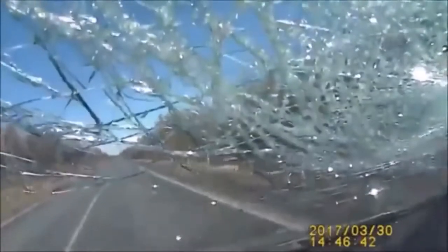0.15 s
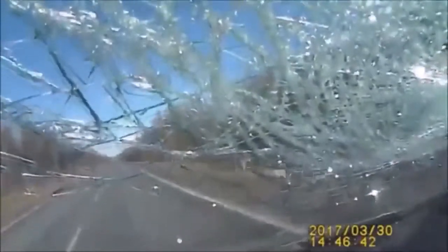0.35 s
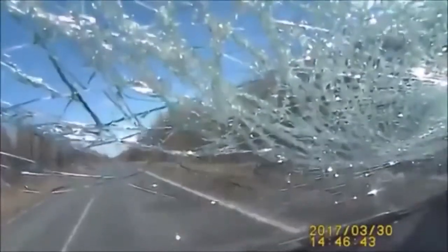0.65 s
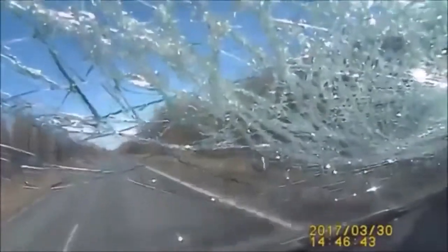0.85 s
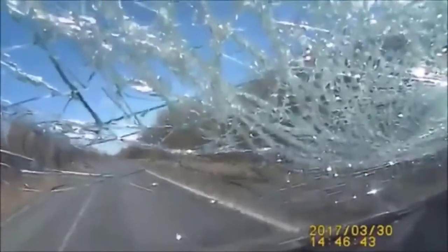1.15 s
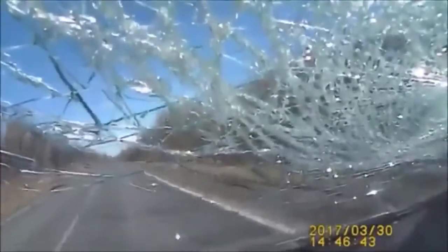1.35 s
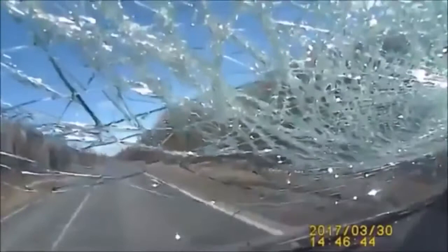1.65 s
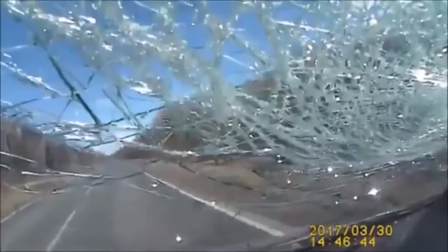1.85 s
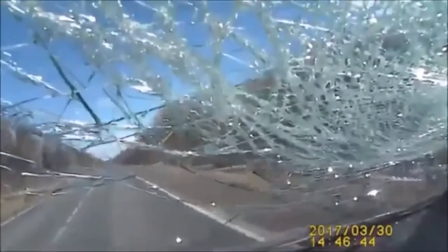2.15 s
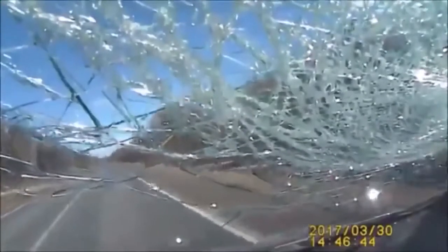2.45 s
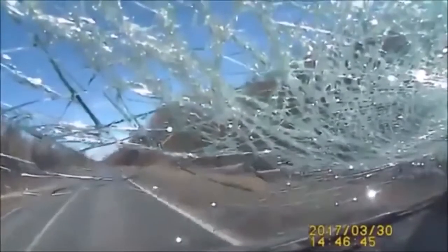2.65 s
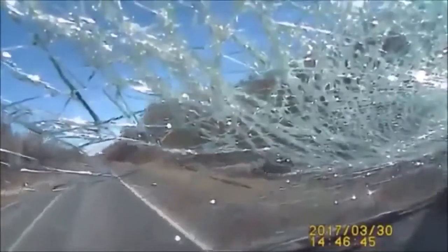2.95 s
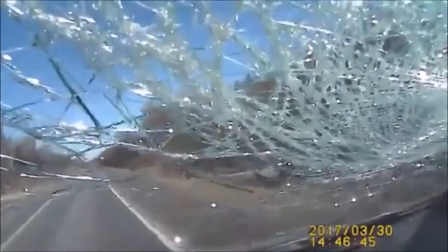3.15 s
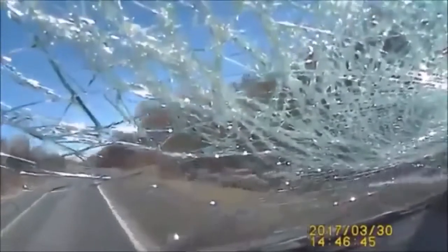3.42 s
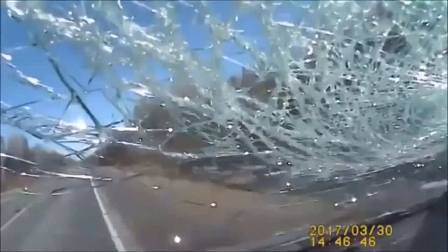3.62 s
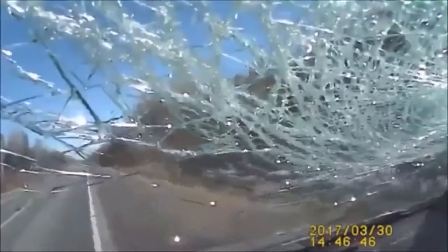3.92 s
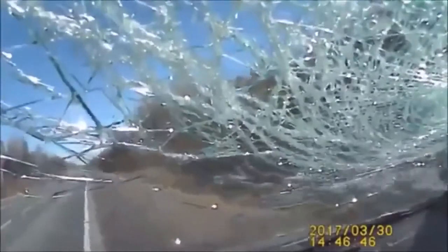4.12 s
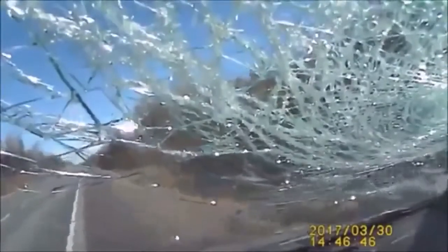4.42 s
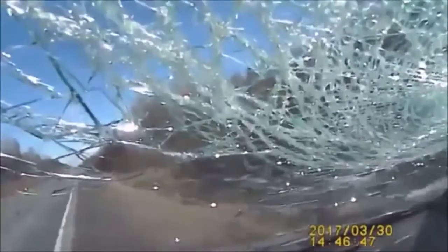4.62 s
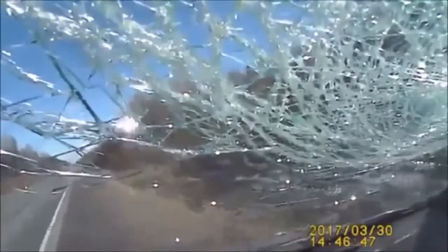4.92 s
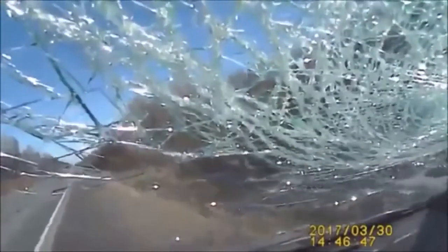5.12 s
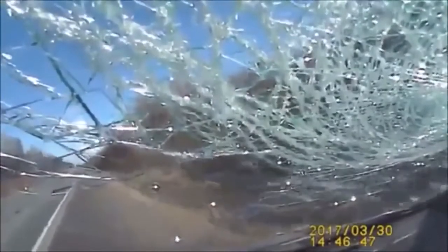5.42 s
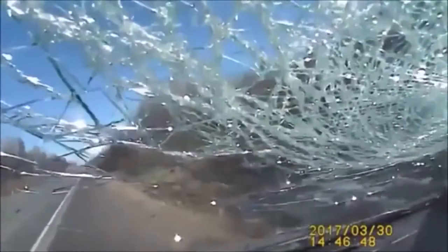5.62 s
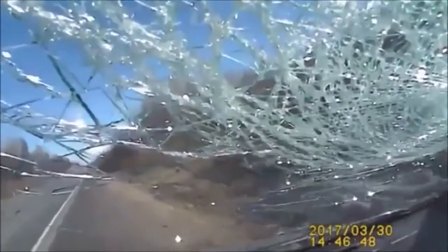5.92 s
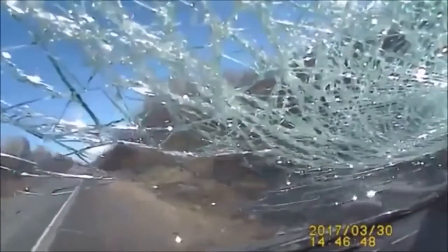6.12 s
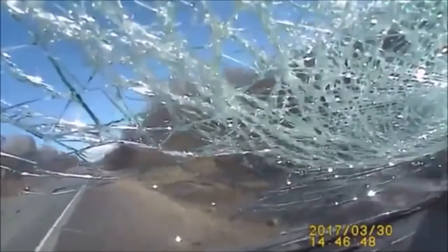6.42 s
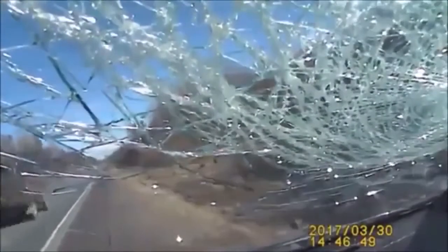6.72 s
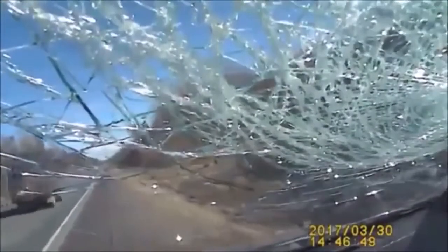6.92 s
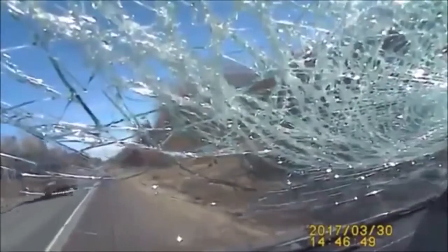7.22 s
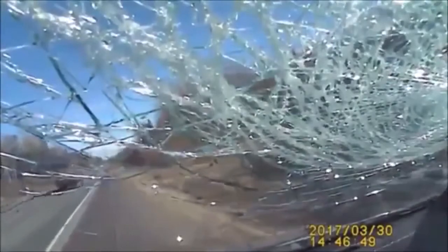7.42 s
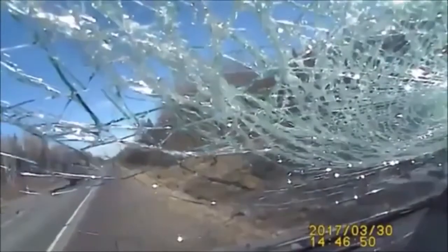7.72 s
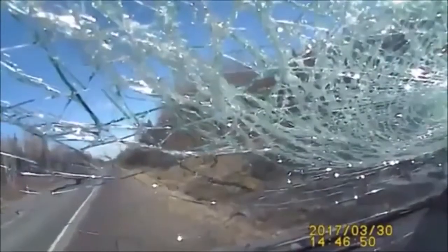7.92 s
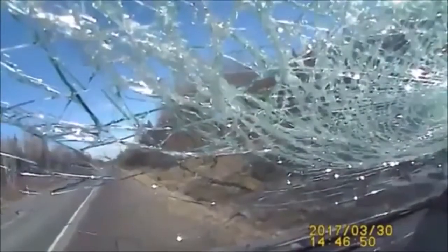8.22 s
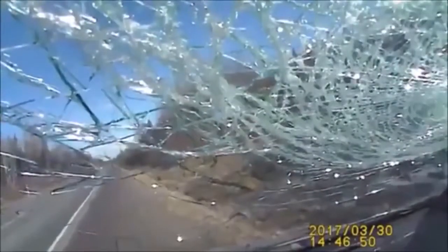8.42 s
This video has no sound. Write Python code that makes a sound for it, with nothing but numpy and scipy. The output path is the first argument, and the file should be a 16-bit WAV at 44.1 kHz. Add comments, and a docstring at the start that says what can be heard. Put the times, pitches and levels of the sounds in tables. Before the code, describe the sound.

Inside a moving car, loud tyre roar, body rumble and wind through a cracked windshield fade as it slows. Midway, something crashes twice against the broken pane and tumbles with thumps and crunching glass. Loose glass ticks, then oncoming traffic swells past, dropping in pitch, while a few splinters snap. A small dashboard microphone adds constant hiss and a buzzing whine, and distorts on the hardest blows.

```python
"""Inside a car that slows down and drifts to the roadside behind a shattered windshield.
Tyre roar and wind in the cracks start loud, with a brief tick and a short gust-like surge, then die away.
Near 3.5 s something crashes twice against the broken pane and tumbles, and loose glass ticks as it settles.
From about 6 s oncoming traffic swells and passes, dropping in pitch, while a few more splinters snap.
All along, a small dashboard camera adds its own hiss and pulsing whine; the hardest blows overload it."""
import sys
import numpy as np
from scipy import signal
from scipy.fft import rfft, irfft, next_fast_len
from scipy.io import wavfile

SR = 44100
rng = np.random.default_rng(int(sys.argv[2]) if len(sys.argv) > 2 else 0)


def persist_wave(psi):
    """Save psi, clipped to +-1, as 16-bit WAV."""
    counts = np.round(np.clip(psi, -1, 1) * 32767).astype(np.int16)
    wavfile.write(sys.argv[1], SR, np.atleast_2d(counts).T)


N = 377496
TIME = np.arange(N) / SR
AGE = TIME[:SR // 2]   # seconds since a hit

# Tone colours of the noises, each listed as (pitch [Hz], relative level [dB])
HISS_COLOUR = [(60, -2), (1000, -3.5), (2500, -4), (4000, -1.5), (6000, 1), (7300, 8.5), (8000, -37)]   # the camera's electronics
RUMBLE_COLOUR = [(40, -22), (80, -8), (115, -3.5), (200, -4), (330, 2.5), (480, -2.5), (700, -8.5),
                 (1500, -38)]   # the shaking car body
BOOM_COLOUR = [(15, -15), (30, -7.5), (55, 2), (90, -1), (130, -13), (300, -49)]   # the suspension
SWAY_COLOUR = [(3, -5.5), (8, -10.5), (18, -12), (28, -8), (45, -27), (120, -62), (400, -79)]   # air swaying in the cabin
ROAR_COLOUR = [(300, -37), (480, -6.5), (630, -3.5), (760, -0.5), (960, -6), (1150, -2.5), (1350, -9.5),
               (1600, -20.5), (2600, -29)]   # tyres on the road
TREAD_COLOUR = [(450, -35), (650, -13.5), (810, -6), (900, -3.5), (990, -7), (1200, -12), (1500, -28),
                (2500, -44)]   # the hum of the tyre tread
WIND_COLOUR = [(900, -21), (1400, -0.5), (1900, -0.5), (2500, 5), (2900, -0.5), (3300, -9), (4500, -9),
               (7000, -22.5)]   # wind in the cracks
# The camera's electrical whine, an even ladder of tones: (rung [number], level [dB], flip time [s])
WHINE_TONES = [(0, -50.5, 0.00067), (1, -48, .001), (2, -42.5, 0.0025), (3, -39, .001), (4, -31.5, 0.00055),
               (5, -19.5, 0.00034)]
# Pitches that the closed cabin boosts: (pitch [Hz], width [Hz], boost [dB])
CABIN_BOOSTS = [(122, 19, 4), (184, 58, 4), (342, 120, 1.5), (582, 43, 2.5), (648, 17, 7), (727, 22, 3),
                (940, 25, 4.5), (1054, 8.7, 7)]
# The car's speed, told by how loud its body rumbles: (time [s], level [dB])
SPEED_AS_RUMBLE = [(0, -23.5), (1.25, -24.5), (1.85, -26.5), (2.3, -29), (3.25, -31), (4.3, -38.5),
                   (4.6, -41), (5.25, -40.5), (5.55, -45), (6.2, -42), (8.5, -43.3)]
# Bumps in the road that rock the car: (time [s], boom level [dB])
ROAD_BUMPS = [(.02, -41), (1.3, -45), (3.15, -37.5), (3.6, -30.5), (4.17, -34.5), (5.2, -43), (6.4, -46),
              (7.5, -41)]
# Swells of tyre noise from oncoming traffic: (time [s], level [dB], half width [s])
TRAFFIC_SWELLS = [(6.07, -28, 0.3), (6.78, -25.5, 0.22), (7.22, -29, 0.27), (7.9, -29, 0.25),
                  (8.4, -30, .25)]
# Pitches at which grinding glass edges ring: (pitch [Hz], width [Hz], relative level [dB])
GLASS_RINGS = [(1980, 230, -4.5), (2380, 260, 1.5), (2830, 260, 0), (3570, 630, -7), (4440, 840, -8),
               (5120, 970, -12.5), (6630, 410, -12)]
# Pitches at which the panel (pane and dashboard) rings: (pitch [Hz], width [Hz], relative level [dB])
PANEL_RINGS = [(171, 136, -9), (302, 53, -3.5), (439, 114, -2.5), (624, 102, -3), (770, 53, 2),
               (1022, 104, -2.5), (1245, 130, -6.5), (1660, 240, -11.5)]
# Splinters snapping off along the cracks: (time [s], snap level [dB], clink pitch [Hz], clink level [dB])
SPLINTERS = [(1.102, -23, 3900, -18), (3.013, -21, 550, -12), (4.122, -32, 2800, -24),
             (4.347, -33, 3070, -22), (6.285, -23, 2410, -33), (7.282, -12, 1110, -7.5),
             (7.492, -19, 2700, -30)]
# Low thumps during the crash and tumble: (time [s], level [dB], pitch [Hz], fade time [s])
LOW_THUMPS = [(3.618, -9, 60, .14), (3.697, 5.5, 119, 0.04), (3.834, -26, 134, 0.17),
              (4.174, -23, 187, .18), (4.245, -15.5, 256, .11)]
# A brief tick and a short gust-like surge in the road noise, then (from 3.4 s) the blows on the pane:
# (time [s], panel level [dB], glass level [dB], base rise time [s], base fade time [s],
# ring pitch [Hz], ring level [dB])
SUDDEN_SOUNDS = [(0.13, -17, -28, .001, 0.07, 770, -25), (.652, -13.5, -31, 0.0064, 0.23, 741, -18),
                 (3.4464, 0, -3.5, 0.0009, 0.29, 653, -12), (3.516, -8.5, -7.5, 0.0015, 0.14, 770, -19),
                 (3.540, -11, -33, 0.0026, 0.084, 624, -15), (3.6153, -1.5, -2.5, 0.00052, .19, 794, 2),
                 (3.665, -15.5, -41, .002, 0.24, 439, -24), (3.704, -6, -12, 0.013, 0.16, 265, -6.5),
                 (3.729, -10.5, -13, .002, 0.096, 439, -16), (3.771, -5, -10, 0.0035, 0.1, 1140, -1.5),
                 (3.813, -9, -16, 0.0044, 0.22, 694, -3), (3.852, -17, -20.5, .004, 0.28, 770, -24),
                 (3.884, -16, -34, .003, 0.14, 770, -24), (4.035, -19, -16, 0.0045, 0.15, 1100, -30),
                 (4.17, -22.5, -16.5, 0.006, 0.3, 1116, -21), (4.241, -13, -13, 0.00077, 0.14, 1093, -16),
                 (4.255, -14.5, -13.5, 0.0012, 0.12, 1087, -7), (4.721, -28, -45, .007, 0.27, 1015, -24)]

CRUISE_DB = -24   # the rumble at cruising speed
SNAP_RISE_S, SNAP_FADE_S = 0.0005, 0.073   # a fade time is how long a sound takes to fall by 60 dB


def from_db(db):
    """Turn decibels into a number to multiply by."""
    return 10 ** (np.asarray(db) / 20)


def unit_power(x):
    """Scale a signal so that its average power is one."""
    return x / np.sqrt(np.mean(x ** 2) + 1e-20)


def noise(colour):
    """Noise with the given tone colour and a power of one."""
    hz, db = np.transpose(colour)
    size = next_fast_len(N)
    pitches = np.maximum(np.fft.rfftfreq(size, 1 / SR), 1)
    gain = from_db(np.interp(np.log(pitches), np.log(hz), db))
    return unit_power(irfft(rfft(rng.standard_normal(size)) * gain, size)[:N])


def drift(per_s):
    """A random wobble that heads for a new value per_s times a second."""
    points = rng.standard_normal(4096)
    return unit_power(np.interp(TIME * per_s, np.arange(len(points)), points))


def crackle(per_s, spread_db):
    """Tiny random clicks; spread_db sets how uneven their sizes are."""
    sizes = from_db(spread_db * np.minimum(rng.exponential(1, N), 4))
    return unit_power(sizes * rng.choice([-1, 1], N) * (rng.random(N) < per_s / SR))


def resonate(x, rings):
    """Make a signal ring at several pitches at once; white noise keeps about the same power."""
    out, power = 0, 0
    for k, (hz, width, db) in enumerate(rings):
        decay = np.exp(-np.pi * width / SR)
        gain = from_db(db) * (-1) ** k   # every second ring is upside down
        scale = (1 - decay ** 2) / 2
        feedback = [1, -2 * decay * np.cos(2 * np.pi * hz / SR), decay ** 2]
        out = out + gain * signal.lfilter([scale, 0, -scale], feedback, x + 1e-18)
        power += gain ** 2 * scale
    return out / np.sqrt(power)


def low_pass(x, hz, edge_hz=70):
    """Cut away everything above a pitch, without delaying the sound."""
    margin = SR // 20
    padded = np.pad(x, (margin, next_fast_len(N + 2 * margin) - N - margin), mode="reflect")
    gain = .5 - .5 * np.tanh((np.fft.rfftfreq(len(padded), 1 / SR) - hz) / edge_hz)
    return irfft(rfft(padded) * gain, len(padded))[margin:margin + N]


def burst(db, rise_s, fade_s):
    """The loudness of one short sound: it rises and dies away."""
    return from_db(db) * np.exp(-np.log(1000) * AGE / fade_s) * -np.expm1(-AGE / rise_s)


def ping(db, hz, rise_s, fade_s):
    """One pure tone that swells and dies away."""
    return burst(db, rise_s, fade_s) * np.sin(2 * np.pi * hz * AGE)


def placed(pieces):
    """Lay out (time [s], short sound) pairs on one track."""
    out = np.zeros(N + SR)
    for s, piece in pieces:
        start = round(s * SR)
        out[start:start + len(piece)] += piece
    return out[:N]


def camera_hiss(level_db=-32, waver_db=1.0):
    """The camera's own hiss, wavering a little in level."""
    return from_db(level_db + waver_db * drift(per_s=35)) * noise(HISS_COLOUR)


def camera_whine(base_hz=1810.4, step_hz=1125.4, seam_hz=65.36, waver_db=1.0):
    """Electrical tones flip over at each seam between the camera's blocks of sound: a ticking buzz."""
    blocks = TIME * seam_hz - 0.69
    from_seam_s = np.sin(np.pi * blocks) / (np.pi * seam_hz)   # crosses zero at each seam
    tones = 0
    for rung, db, flip_s in WHINE_TONES:
        cycles = (base_hz + np.round(rung) * step_hz) * TIME + rng.random()
        flip = np.tanh(from_seam_s / flip_s)
        tones = tones + from_db(db) * np.sqrt(2) * np.sin(2 * np.pi * cycles) * flip
    seams = np.diff(np.floor(blocks), prepend=np.floor(blocks[0]))
    ticks = seams * rng.choice([-1, 1], N) * from_db(-25 + 8.5 * rng.standard_normal(N))
    return tones * from_db(waver_db * drift(per_s=60)) + resonate(ticks, [(7240, 830, 0)])


def cabin(x):
    """Sound bouncing in the closed cabin boosts a few pitches; the overall level stays the same."""
    out = x
    for hz, width, boost_db in CABIN_BOOSTS:
        band = signal.lfilter(*signal.iirpeak(hz, hz / width, fs=SR), x)
        out = out + (from_db(boost_db) - 1) * band
    return out * np.std(x) / np.std(out)


def speed_db():
    """The rumble compared with cruising: it goes below zero as the car slows."""
    times, levels = np.transpose(SPEED_AS_RUMBLE)
    return np.interp(TIME, times, levels) - CRUISE_DB


def faint_crackle(cruising_db=-36, low_hz=1700, high_hz=4300, count=16):
    """A faint, dry, high crackle that gets quieter as the car slows."""
    ticks = crackle(per_s=200, spread_db=2.0)
    choice = rng.integers(0, count, N)   # which pitch each tick gets
    pitches = np.geomspace(low_hz, high_hz, count)
    pings = sum(resonate(ticks * (choice == k), [(hz, 70, 0)]) for k, hz in enumerate(pitches))
    return unit_power(pings) * from_db(cruising_db + 0.5 * speed_db())


def tyres(tread_share, tread_hz):
    """Rolling tyres make a broad roar, and their tread hums at a gliding pitch."""
    position_s = np.cumsum(tread_hz / 900) / SR   # play a 900 Hz hum faster or slower
    tread = np.interp(position_s % TIME[-1], TIME, noise(TREAD_COLOUR))
    return np.sqrt(1 - tread_share) * noise(ROAR_COLOUR) + np.sqrt(tread_share) * tread


def driving(boom_db=-45.5, roar_db=-16.5, wind_db=-26):
    """Rumble, boom, tyre roar and wind fade as the car slows; rough asphalt shakes them together."""
    speed = speed_db()
    shake = from_db(0.86 * drift(per_s=24) + 0.47 * drift(per_s=12))
    rumble = noise(RUMBLE_COLOUR) * from_db(CRUISE_DB + speed)
    boom = noise(BOOM_COLOUR) * from_db(boom_db + 0.75 * speed)
    roar = tyres(tread_share=0.27, tread_hz=956 + 8 * speed) * from_db(roar_db + 1.395 * speed)
    wind = noise(WIND_COLOUR) * from_db(wind_db + speed + 1.53 * drift(per_s=37))
    return shake * (rumble + boom + roar + wind)


def rocking(bump_width_s=0.17, steady_sway_db=-40.5, sway_over_boom_db=4.5):
    """Each bump makes the suspension boom and the cabin air sway harder for a moment."""
    bumps = sum(from_db(db) * np.exp(-.5 * ((TIME - s) / bump_width_s) ** 2) for s, db in ROAD_BUMPS)
    sway = from_db(steady_sway_db) + from_db(sway_over_boom_db) * bumps
    return noise(BOOM_COLOUR) * bumps + noise(SWAY_COLOUR) * sway


def traffic(pass_s=7.3, glide_s=0.3, pass_hz=865.5, draught_db=-16):
    """Oncoming tyres swell and drop in pitch as they pass; their draught hisses in the cracks."""
    power = sum(from_db(db) ** 2 / (1 + ((TIME - s) / width) ** 2) ** 1.41
                for s, db, width in TRAFFIC_SWELLS)
    falling_hz = pass_hz * (1 - 0.095 * np.tanh((TIME - pass_s) / glide_s))
    gusts = from_db(1.25 * drift(per_s=16))
    roar = tyres(tread_share=0.64, tread_hz=falling_hz)
    draught = from_db(draught_db) * noise(WIND_COLOUR)
    return np.sqrt(power) * gusts * (roar + draught)


def settling_glass(level_db=-39, peak_s=4.25, width_s=0.2):
    """Loose splinters tick against each other while the pane settles after the crash."""
    unrest = np.exp(-.5 * ((TIME - peak_s) / width_s) ** 2)
    ticks = crackle(per_s=150, spread_db=3.5)
    return from_db(level_db) * resonate(unrest * ticks, GLASS_RINGS)


def snapping_glass():
    """Each splinter snaps in one short rush, too light to stir the panel's two lowest rings."""
    snaps = placed((s, burst(db, SNAP_RISE_S, SNAP_FADE_S)) for s, db, _, _ in SPLINTERS)
    rush = snaps * crackle(per_s=9700, spread_db=3.0)
    return resonate(rush, GLASS_RINGS) + resonate(rush, PANEL_RINGS[2:])


def clunks(ring_rise_s=0.0023, thump_rise_s=0.002, fade_share=0.47):
    """A short ring for each sudden sound, low thumps during the crash and tumble, and splinter clinks."""
    rings = [(s, ping(db, hz, ring_rise_s, fade * fade_share)) for s, *_, fade, hz, db in SUDDEN_SOUNDS]
    thumps = [(s, ping(db, hz, thump_rise_s, fade)) for s, db, hz, fade in LOW_THUMPS]
    clinks = [(s, ping(db, hz, SNAP_RISE_S, SNAP_FADE_S * fade_share)) for s, _, hz, db in SPLINTERS]
    return placed(rings + thumps + clinks)


def crash(panel_rise_share=0.24, glass_fade_share=0.74):
    """The early tick and surge, then the blows, where glass cracks briefly and the panel rings longer."""
    panel_power = placed((s, burst(db, rise * panel_rise_share, fade) ** 2)
                         for s, db, _, rise, fade, _, _ in SUDDEN_SOUNDS)
    glass_power = placed((s, burst(db, rise, fade * glass_fade_share) ** 2)
                         for s, _, db, rise, fade, _, _ in SUDDEN_SOUNDS)
    panel = resonate(np.sqrt(panel_power) * crackle(per_s=6000, spread_db=0), PANEL_RINGS)
    glass = resonate(np.sqrt(glass_power) * crackle(per_s=9900, spread_db=3.5), GLASS_RINGS)
    return panel + glass


def scene():
    """Road, glass and a faint crackle in the cabin, plus the camera's own noises."""
    hiss = camera_hiss()
    road = driving() + rocking() + traffic()
    clatter = crash() + snapping_glass() + settling_glass() + faint_crackle()
    return (cabin(road + clatter) + clunks() + camera_whine() + hiss)[None]


def record(dry, band_hz=7270, off_centre=-0.28, shift_hz=3900, top_hz=15800):
    """The camera cuts the highs, overloads unevenly and adds two faint copies of the treble higher up."""
    overloaded = np.clip(low_pass(dry[0], band_hz) + off_centre, -1, 1)
    narrow = low_pass(overloaded, band_hz)
    treble = signal.hilbert(narrow - low_pass(narrow, 5100))   # in a form that can be shifted in pitch
    shift = np.exp(2j * np.pi * shift_hz * TIME)
    copies = np.real(treble * (from_db(-31) * shift + from_db(-46) * shift ** 2))
    clipped = np.clip(narrow + copies, -1, 1)   # the blows hit the limit once more
    return low_pass(clipped, top_hz)[None]


dry = scene()
out = record(dry)
persist_wave(out)
```